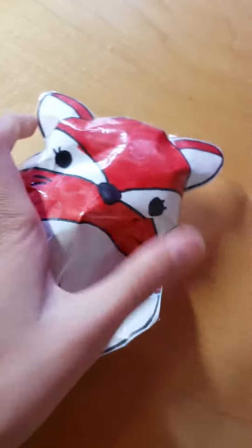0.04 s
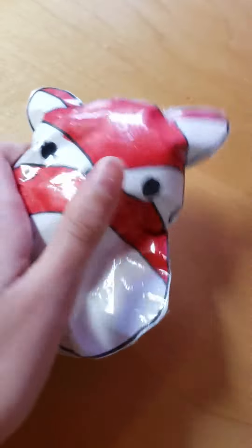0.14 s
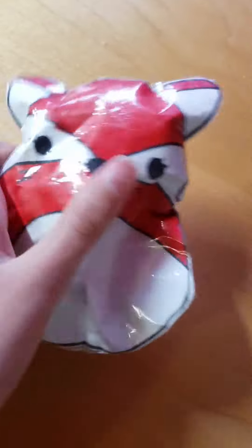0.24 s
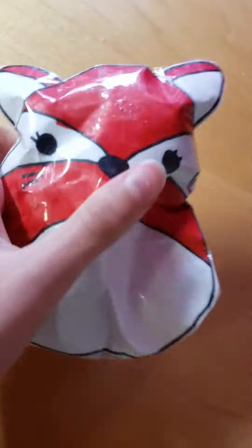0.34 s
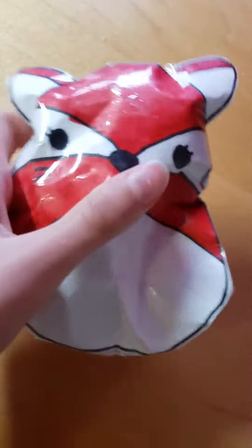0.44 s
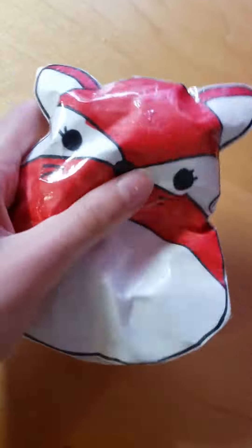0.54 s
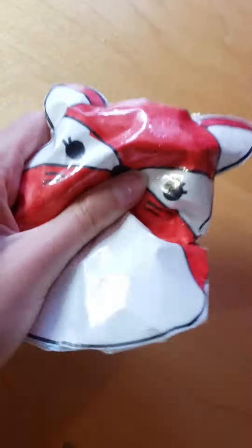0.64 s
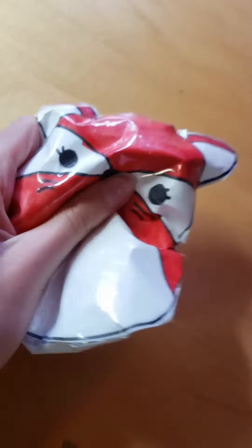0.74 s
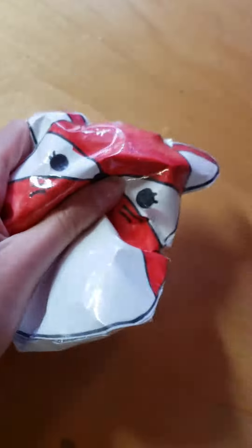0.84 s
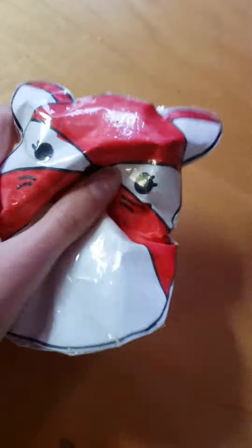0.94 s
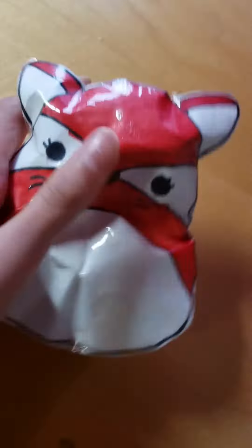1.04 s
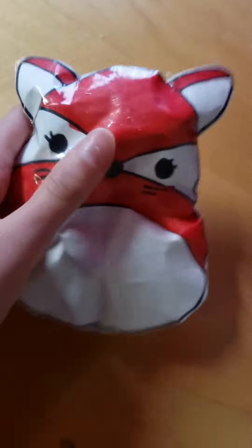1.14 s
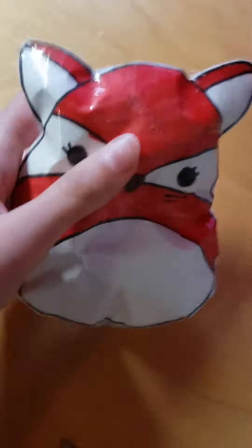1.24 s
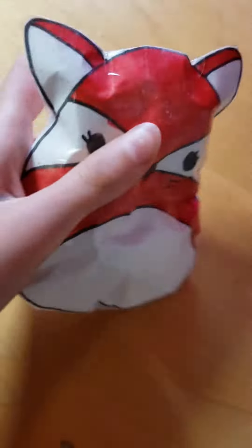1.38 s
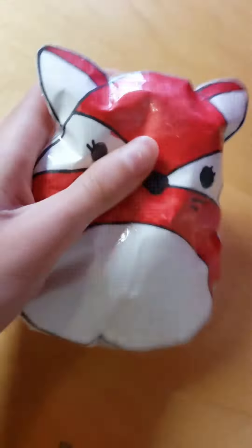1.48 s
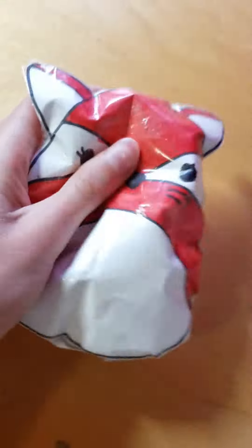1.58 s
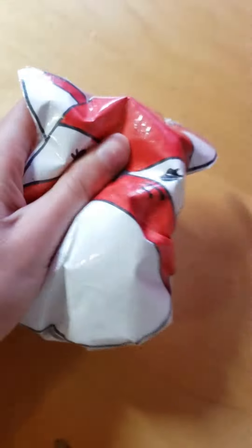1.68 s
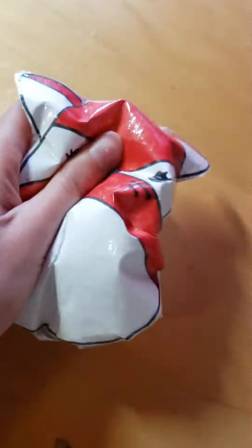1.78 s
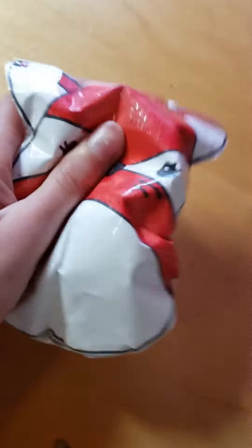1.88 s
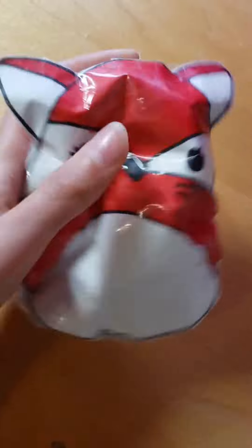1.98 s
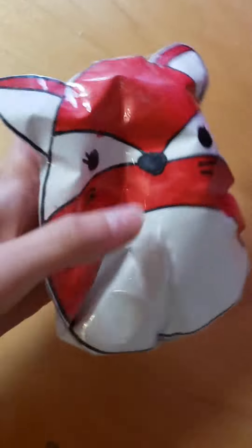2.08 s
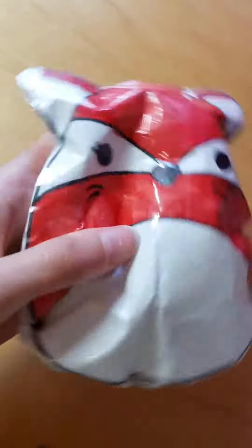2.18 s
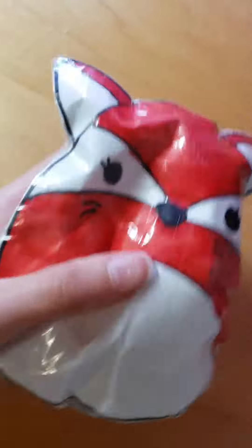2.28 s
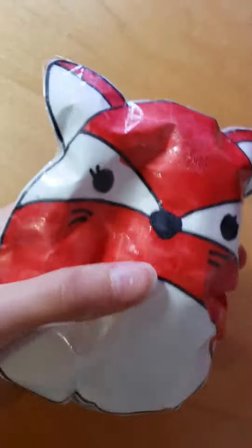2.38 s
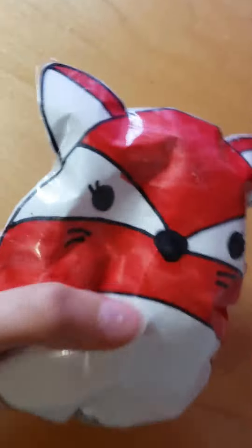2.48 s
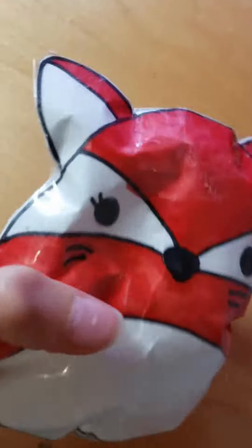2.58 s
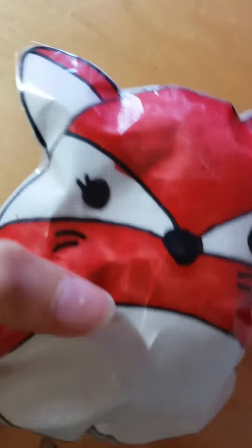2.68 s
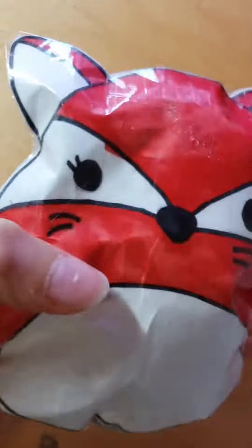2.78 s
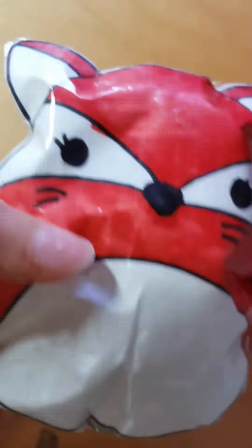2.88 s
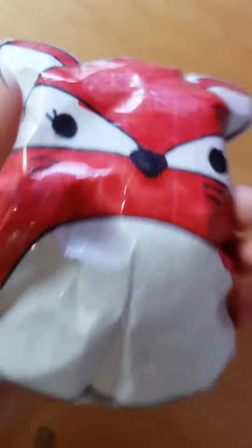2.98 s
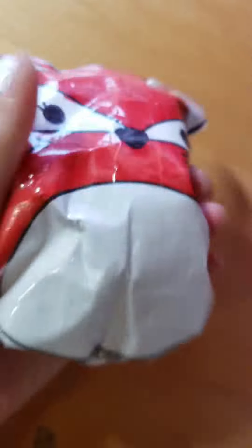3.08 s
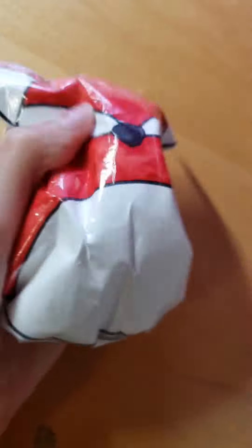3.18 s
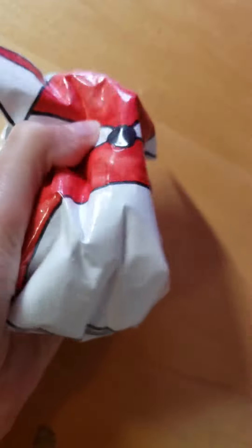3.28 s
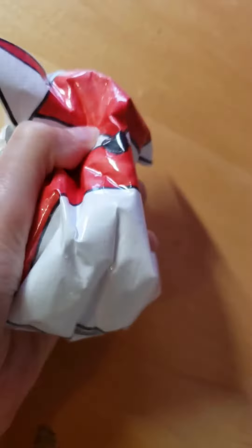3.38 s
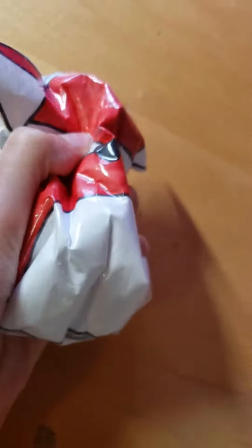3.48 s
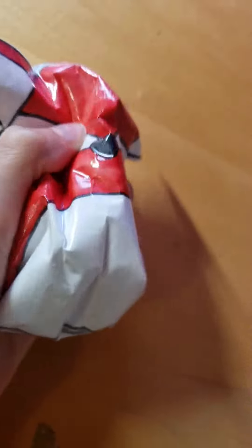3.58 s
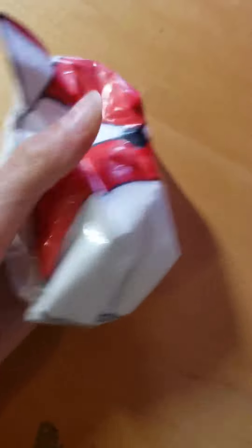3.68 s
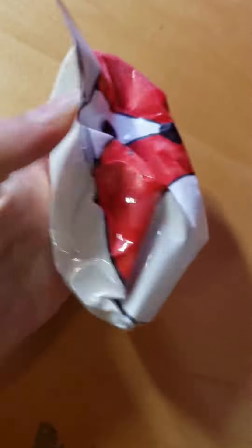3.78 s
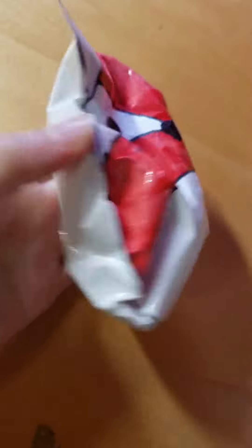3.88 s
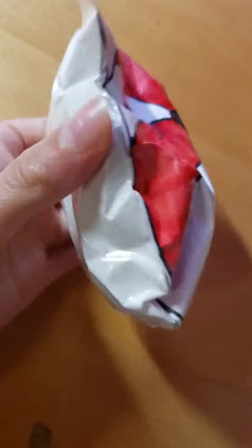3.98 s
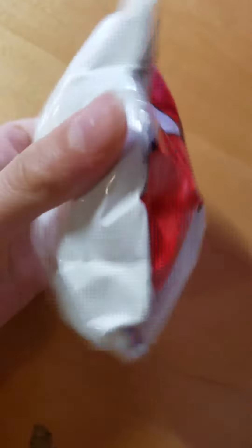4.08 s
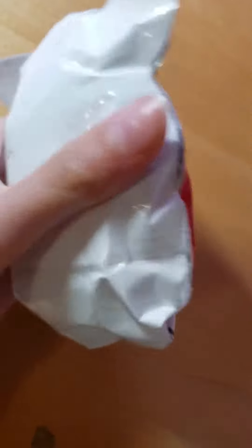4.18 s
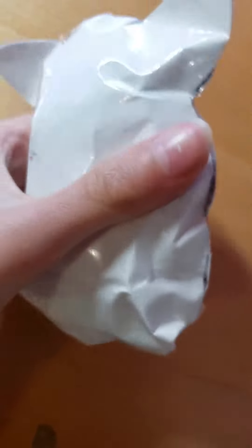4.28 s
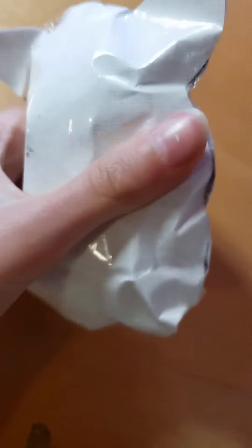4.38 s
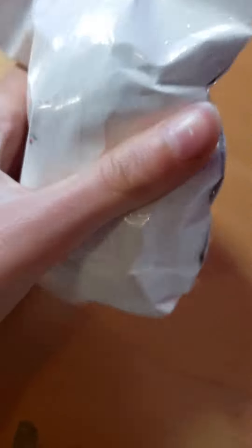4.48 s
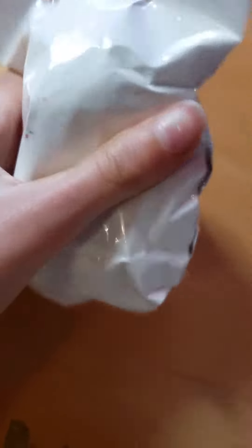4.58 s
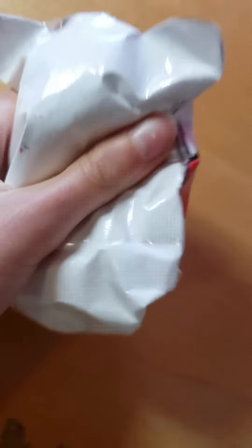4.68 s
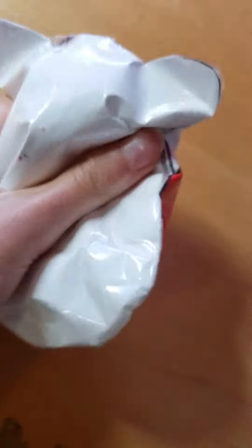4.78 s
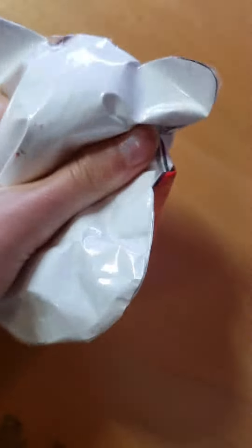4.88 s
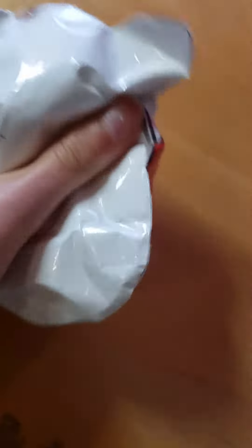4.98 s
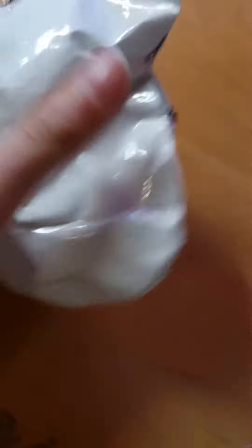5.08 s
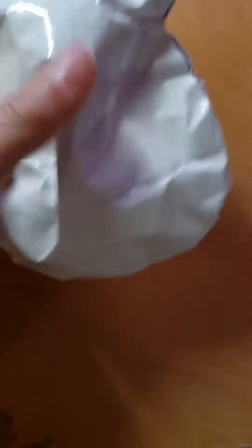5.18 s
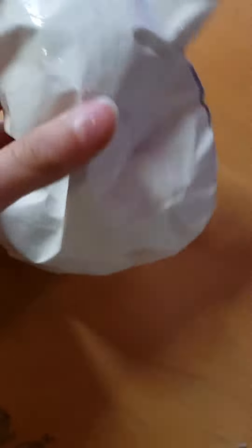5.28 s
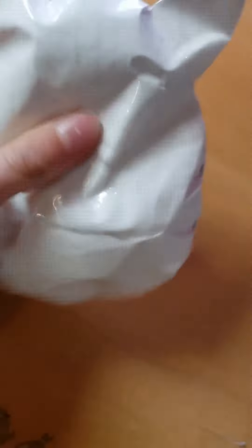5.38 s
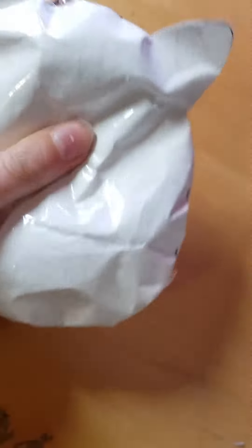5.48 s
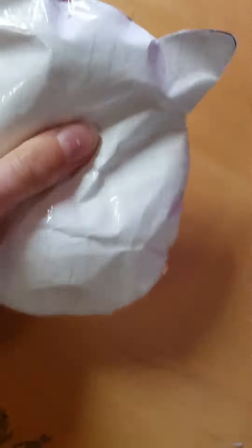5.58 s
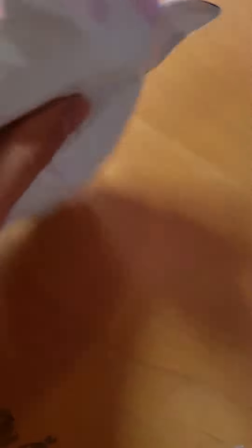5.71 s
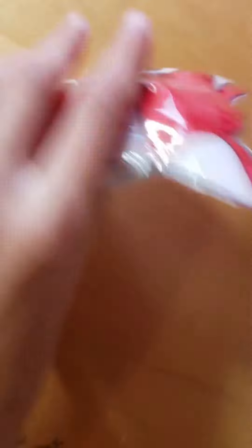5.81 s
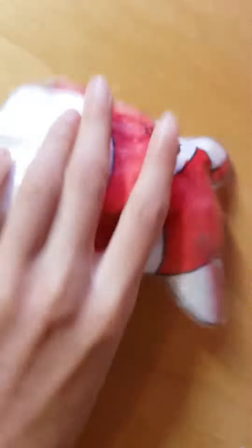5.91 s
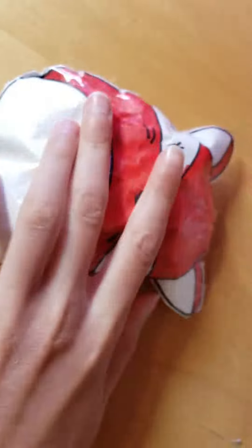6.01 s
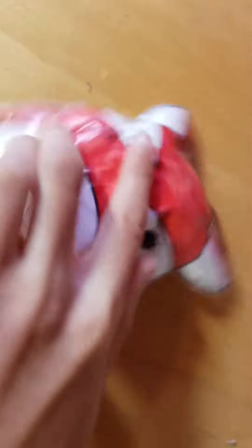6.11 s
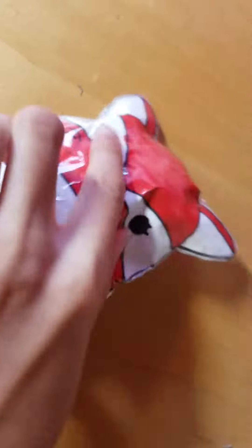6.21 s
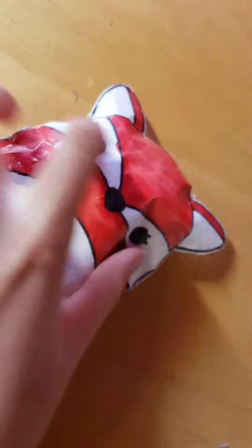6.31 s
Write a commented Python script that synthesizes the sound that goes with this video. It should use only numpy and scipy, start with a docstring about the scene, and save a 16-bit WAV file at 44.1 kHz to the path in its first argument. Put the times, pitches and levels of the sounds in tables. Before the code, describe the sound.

A puffy taped paper toy is worked in the fingers near the microphone. It starts with light crinkling, then one very loud snap, another hard low pop, a quieter passage of small creases and dull thumps, and then repeated crisp clusters of buckling as it is squeezed, turned over and handled. Air breathes out softly with the squeezes; the small room answers briefly.

```python
"""Facets of a hollow, tape-covered paper toy buckle with sharp snaps as a hand squeezes and releases it.
Each snap is a short push ringing facet and shell, with a crack of tape; smaller creases crackle and crinkle.
Shaped noise makes the low flutter of the body and the hiss of air through the seams as it empties and refills.
Soft low bumps and rubs of the hand and one faint squeak join in, close up over a table.
A small quiet room answers the toy, above a faint steady room tone."""
import sys
import numpy as np
from scipy import signal
from scipy.fft import rfft, irfft, next_fast_len
from scipy.io import wavfile

SR = 44100
rng = np.random.default_rng(int(sys.argv[2]) if len(sys.argv) > 2 else 0)


def pcm_store(signal):
    """Save signal as 16-bit PCM."""
    levels = np.round(np.clip(np.atleast_2d(signal), -1, 1) * 32767)
    wavfile.write(sys.argv[1], SR, levels.astype(np.int16).T)


N = 279946
T = np.arange(N) / SR  # seconds

# Background hum and hiss. Each row: frequency in Hz, relative level in dB.
ROOM_TONE_SPECTRUM = [(25, 12), (70, 22), (180, 15.5), (700, -54.5), (1300, 12.5), (1900, 18), (2500, 1),
                      (6000, -6), (9000, -64), (15000, -98)]
# Colour of the room's answer. Each row: frequency in Hz, relative level in dB.
WALL_SPECTRUM = [(100, 11.5), (400, -2.5), (750, -7), (1600, -4), (3000, -4), (8000, 2), (15000, 4)]
# Soft bumps of the hand. Each row: time in seconds, peak in dB, pitch in Hz.
HAND_BUMPS = [(2.455, -21, 184), (2.477, -11.5, 120), (2.537, -31.5, 102), (2.747, -35.5, 130),
              (2.989, -40.5, 117), (3.046, -19.5, 138), (6.317, -23, 114)]
# Colour of the escaping air. Each row: frequency in Hz, relative level in dB.
AIR_SPECTRUM = [(150, -26), (330, -12.5), (1300, -1), (1950, 1), (3000, -4.5), (4300, -8.5), (7400, -6),
                (8700, -11), (12300, -1.5), (15500, -1)]
# Strokes of the hand, squeezing or letting go.
# Each row: start of the hold in seconds, hold in seconds, paper level in dB, air level in dB (both before trim).
HAND_STROKES = [(0.0, 0.01, -40.5, -44), (0.145, 0.021, -51.5, -67), (0.316, 0.053, -44.5, -53),
                (0.551, 0.005, -40.5, -62.0), (0.632, 0.103, -37, -43.5), (1.018, 0.12, -50, -46.5),
                (1.311, 0.055, -46, -56), (1.576, 0.007, -29.5, -45.5), (1.61, 0.22, -51, -50),
                (2.006, 0.081, -46.5, -42), (2.271, 0.086, -44.5, -60.5), (2.474, 0.17, -56, -58),
                (2.731, 0.11, -54.5, -66), (2.997, 0.14, -47, -59), (3.214, 0.13, -33.5, -42),
                (3.739, 0.04, -39.5, -39.5), (3.848, 0.15, -50, -50), (4.056, 0.12, -44.5, -55.5),
                (4.192, 0.015, -34.5, -48), (4.511, 0.009, -36, -54.0), (4.691, 0.07, -50.5, -51),
                (4.786, 0.035, -36, -41), (5.117, 0.025, -39.5, -35.5), (5.459, 0.0035, -30.5, -44.5),
                (5.774, 0.12, -39.5, -47.5), (6.014, 0.005, -30.0, -50.5), (6.197, 0.199, -44, -49)]
# Resonances of the paper shell, the belly first, before each snap shifts them.
# Each row: centre in Hz, width in Hz, relative level in dB.
SHELL_MODES = [(382, 300, 2), (920, 130, -5.5), (1912, 170, 3.5), (3600, 2900, -3.5), (5550, 1100, 1.5)]
# Resonances of the tape skin. Each row: centre in Hz, width in Hz, relative level in dB.
TAPE_MODES = [(4300, 6500, 1), (12800, 5400, 5)]
# Large facets that buckle.
# Each row: time in seconds, level in dB over 1 ms, facet pitch in Hz, tape crack in dB over 1 ms.
FACET_SNAPS = [(0.174, -38, 1920, -68), (0.247, -24, 2040, -45), (0.3295, -18.5, 1620, -43.0),
               (0.5658, -24.5, 1140.0, -52.0), (0.6, -25.5, 1200, -53), (0.633, -21.5, 800, -50),
               (0.642, -24.5, 2190, -24.5), (0.6879, 0, 1630, -40), (0.7332, -23, 1400, -29),
               (0.746, -17.5, 1690, -53), (0.7697, -24.5, 2420.0, -53), (1.0205, -31.5, 2640, -35.5),
               (1.053, -23.5, 2000, -32), (1.081, -12.5, 1630.0, -22.0), (1.3223, -26.5, 1360, -51),
               (1.4441, -23, 1270, -43), (1.52, -22.5, 1150, -55), (1.5245, -10.5, 600, -60),
               (1.5312, -24.5, 1360.0, -45), (1.5596, -18, 1150, -51), (1.573, -3, 510, -50),
               (1.6074, -12, 1300, -45), (1.6265, -25, 1490, -35), (1.6851, -14.5, 1730, -27),
               (1.743, -29, 1690.0, -46), (1.8175, -51, 1830, -34), (1.8351, -33, 1280, -48.5),
               (1.8941, -45.5, 2730, -37.5), (2.0354, -23.5, 1300, -34.5), (2.0563, -23.5, 1280, -20.5),
               (2.2075, -32, 1820.0, -42.0), (2.2157, -29.5, 1690, -43), (2.2799, -21.5, 1280, -34.5),
               (2.322, -18.5, 1750.0, -33.5), (2.359, -39, 1830, -59), (2.4683, -28.5, 570.0, -56),
               (2.4978, -24.5, 1200, -61.5), (2.5462, -29.0, 823, -49), (2.7265, -29.5, 2800, -41.5),
               (2.8307, -34, 2030, -53.5), (2.9672, -29, 2600.0, -38), (3.0192, -29, 2010, -41.5),
               (3.0629, -22, 1120, -62), (3.1995, -18, 975, -42), (3.2047, -20.5, 2000, -33),
               (3.2111, -9.5, 1310, -43), (3.2247, -29, 2700, -24.5), (3.2333, -8.5, 600, -35.0),
               (3.2959, -10.0, 1620, -36), (3.3842, -32.5, 1300, -42.5), (3.4246, -27.5, 2240, -44),
               (3.7202, -7, 2000, -21.5), (3.7649, -18.5, 1440, -33.0), (3.9844, -34.0, 1730, -30),
               (4.1892, -20, 1730, -33), (4.2053, -12, 1330, -33), (4.2157, -24.5, 1590, -40),
               (4.4877, -24.0, 1980, -29.5), (4.5271, -16, 1930, -49), (4.5356, -5.5, 1380, -29),
               (4.6588, -41.5, 2600, -39.5), (4.6835, -30, 2280, -37), (4.7273, -22, 1760, -25),
               (4.7544, -31.5, 2620, -31.0), (4.7987, -8.5, 1420, -21), (4.81, -7.5, 1010, -39),
               (4.8553, -24.0, 1000, -43), (5.1062, -20.0, 1230, -29.5), (5.1575, -14.0, 1430, -26),
               (5.1605, -21, 2590, -20), (5.4049, -15.5, 685, -61.5), (5.4387, -14, 1190, -34.5),
               (5.4604, -17, 1430, -42.5), (5.4712, -6.5, 1320, -30), (5.4751, -7.0, 2200, -26.5),
               (5.4926, -22.5, 1030, -41), (5.7698, -17.5, 1140, -48), (5.8804, -20, 1300, -28.5),
               (5.8965, -23, 1410.0, -23.5), (5.909, -25, 880.0, -43), (5.9353, -12.5, 1460, -30.5),
               (5.9947, -21.5, 1300, -44.0), (6.02, -10.5, 1420, -34), (6.0414, -8, 1210, -29),
               (6.0614, -24, 1400, -48), (6.2332, -24.5, 1580, -39.5), (6.315, -7, 1210, -34.0)]

TOP_HZ = 15750
PAPER_RISE_DB_PER_S, PAPER_FALL_DB_PER_S = 328, 228.5  # the paper stirs and settles with the fingers
AIR_RISE_DB_PER_S, AIR_FALL_DB_PER_S = 282.5, 124.5  # the air leaks on for longer
MIDDLE_FACET_HZ, BELLY_DB, BELLY_DB_PER_OCTAVE = 1370, 0.5, 9  # larger, lower facets shake the belly more
RUB_BELOW_BUMP_DB, RUB_LEAD_S, RUB_FADE_DB_PER_S = -28, 0.132, 120  # the skin slides before each bump
RUB_MOST_DB = -54.5  # ceiling for each single rub
SQUEAK_S, SQUEAK_HALF_S, SQUEAK_HZ, SQUEAK_DB = 0.075, 0.036, 800, -51


def undb(db):
    """Decibels to gain."""
    return 10 ** (np.asarray(db) / 20)


def unit(x):
    """Scale to rms 1."""
    return x / np.sqrt(np.mean(x ** 2))


def noise(size=N):
    """White noise, raw material for every breathy or ragged sound."""
    return rng.standard_normal(size)


def colour(x, points):
    """Filter by a spectrum of (Hz, dB) points, joined along log frequency."""
    hz, db = np.transpose(points)
    size = next_fast_len(len(x))
    f = np.maximum(np.fft.rfftfreq(size, 1 / SR), 1)
    gain = undb(np.interp(np.log(f), np.log(hz), db))
    return irfft(rfft(x, size) * gain, size)[:len(x)]


def walk(rate):
    """Random wander through `rate` new values a second, spread near 1."""
    knots = rng.standard_normal(2048)
    return np.interp(T * rate, np.arange(len(knots)), knots)


def add(out, sound, s):
    """Mix a short sound in, its middle at time s."""
    start = int(s * SR) - len(sound) // 2
    lo, hi = max(start, 0), min(start + len(sound), N)
    if hi > lo:
        out[lo:hi] += sound[lo - start:hi - start]


def swell(gestures, rise_db_per_s, fall_db_per_s):
    """Amplitude of gestures that build, hold and ease off, from rows (hold start s, hold s, dB)."""
    t = T[::50]  # a coarse clock is enough for hand movement
    power = np.zeros(len(t))
    for s, hold_s, db in gestures:
        before = np.maximum(s - t, 0)
        after = np.maximum(t - s - hold_s, 0)
        power += undb(db - rise_db_per_s * before - fall_db_per_s * after) ** 2
    return np.interp(T, t, np.sqrt(power))


def resonance(f, hz, width):
    """Response of one damped mode, gain 1 at its centre."""
    return 1j * f * width / (hz ** 2 - f ** 2 + 1j * f * width)


def room_tone(level_db=-59):
    """Faint background noise with a hump near 2 kHz, drifting slightly in level."""
    return unit(colour(noise(), ROOM_TONE_SPECTRUM)) * undb(level_db + 0.803 * walk(0.57))


def room(x, wet_db=-14, t60=0.34, near_db=-14, near_s=0.0073, size=24000):
    """Quick scatter off the hand and the table, then the tail of a small room."""
    t = np.arange(size) / SR
    near = noise(size) * np.exp(-t / near_s) * (t > .0015)
    near = colour(near, [(200, 14.5), (800, -2.5), (1200, 4.5), (2000, -5.5), (2800, 6), (15000, 7)])
    tail = colour(noise(size) * undb(-60 * t / t60) * (t > .007), WALL_SPECTRUM)
    # each part is scaled by the energy of its decay
    near_norm = np.sqrt(near_s * SR / 2)
    tail_norm = np.sqrt(t60 * SR / 2 / np.log(1000))
    response = undb(near_db) * near / near_norm + undb(wet_db) * tail / tail_norm
    return x + signal.fftconvolve(x, response)[:N]


def rub(slide):
    """Skin shifting its grip rumbles faintly: low noise that follows the slide."""
    rumble = colour(noise(), [(40, -9), (90, -3.5), (180, -6.5), (300, -5), (900, -73)])
    return unit(rumble) * slide


def bumps(cycles=0.66):
    """A soft contact pushes the body through a cycle or two of its lowest motion."""
    out, t = np.zeros(N), np.arange(-2048, 2048) / SR
    for s, db, hz in HAND_BUMPS:
        envelope = np.exp(-(t * hz / cycles) ** 2)
        add(out, undb(db) * np.cos(2 * np.pi * hz * t) * envelope, s)
    return out


def squeak(waver=0.0068):
    """A fingertip sticks and slips on the glossy tape: one faint, brief, wavering tone."""
    phase = 2 * np.pi * np.cumsum(SQUEAK_HZ * (1 + waver * walk(60))) / SR
    envelope = np.exp(-((T - SQUEAK_S) / SQUEAK_HALF_S) ** 2)
    return undb(SQUEAK_DB) * np.sin(phase) * envelope


def air(flow, trim_db=1):
    """Air forced through gaps in the taped seams hisses and flickers with the flow."""
    return unit(colour(noise(), AIR_SPECTRUM)) * flow * undb(trim_db + 2 * walk(33))


def flex(press, level_db=-50, growth=1.94):
    """The whole hollow body flutters low when it is pressed hard."""
    low = colour(noise(), [(25, -15.0), (85, 0.5), (220, -5.5), (360, -6.0), (700, -18), (1500, -41.5)])
    return unit(low * press ** growth * undb(3.0 * walk(40))) * undb(level_db)


def belly(facet_hz):
    """How strongly a facet of this pitch drives the belly mode, dB."""
    return BELLY_DB - BELLY_DB_PER_OCTAVE * np.log2(facet_hz / MIDDLE_FACET_HZ)


def buckle(db, facet_hz, belly_db, crack_db, rough, quickness=2.03, facet_db=4.5, damping=0.79,
           dipole_hz=320, detune=0.029, scatter_db=2, crack_s=0.002, build_s=0.00074, size=768):
    """One facet flips: a bell-shaped push rings the facet and the shell, and the tape on it cracks."""
    f, t = np.fft.rfftfreq(size, 1 / SR), (np.arange(size) - size // 2) / SR
    hz, width, mode_db = np.transpose(SHELL_MODES)

    # every dent reshapes the shell, so its modes shift from snap to snap
    shift, strength = rng.standard_normal((2, len(hz)))
    is_belly = np.arange(len(hz)) == 0
    gain = undb(mode_db + scatter_db * strength + belly_db * is_belly)
    shell = resonance(f[:, None], hz * np.exp(detune * shift), width) @ gain
    facet = undb(facet_db) * resonance(f, facet_hz, damping * facet_hz)

    # an avalanche of tiny slips builds up to the flip and dies away after it
    slips = noise(size) * np.exp(-np.abs(t) / np.where(t < 0, build_s, crack_s))
    force = (t == 0) + rough * slips / np.linalg.norm(slips)
    push = 1 / (1 + (f / (quickness * facet_hz)) ** 2) ** 2  # large facets flip slowly and sound dull
    radiation = f ** 2 / np.hypot(f ** 2, dipole_hz ** 2)  # a small sheet radiates little bass
    body = irfft(rfft(force) * push * (shell + facet) * radiation)

    tape = sum(undb(g) * resonance(f, centre, w) for centre, w, g in TAPE_MODES) * (f < TOP_HZ)
    crack = irfft(rfft(slips * np.exp(-np.abs(t) / crack_s)) * tape)  # the stiff tape settles sooner

    millisecond = np.sqrt(SR / 1000 / size)  # turns rms over the whole snap into level over 1 ms
    return millisecond * (undb(db) * unit(body) + undb(crack_db) * unit(crack))


def crinkle(press, facet_hz=1400, spread_db=6.5, belly_db=0, crack_db=-29, trim_db=-2, count=2100):
    """A dense scatter of tiny creases of all sizes, each giving way in a ragged run of slips."""
    out = np.zeros(N)
    times = rng.uniform(0, N / SR, count)
    chance = np.clip(rng.standard_normal((count, 3)), -2, 2)
    for s, (strength, smallness, belly_chance) in zip(times, chance):
        db = spread_db * strength
        hz = facet_hz * np.exp(0.5 * smallness)
        crease = buckle(db, hz, belly_db + 4 * belly_chance, db + crack_db, rough=1.6,
                        quickness=2.2, facet_db=7.5, damping=0.18)
        add(out, crease, s)
    return unit(out) * press * undb(trim_db)


def crackle(press, above_press_db=4, spread_db=4, facet_hz=1750, light_press_db=-48, octaves_per_db=0.19,
            spread_octaves=0.34, crack_db=-24, rough=0.8, count=190):
    """Middling facets give way at random; a harder press folds larger ones, louder and lower."""
    out = np.zeros(N)
    times = rng.uniform(0, N / SR, count)
    pressed = 20 * np.log10(np.interp(times, T, press) + 1e-9)
    chance = np.clip(rng.standard_normal((count, 3)), -1.7, 1.7)
    for s, press_db, (strength, smallness, taped) in zip(times, pressed, chance):
        db = press_db + above_press_db + spread_db * strength
        lowering = octaves_per_db * max(press_db - light_press_db, 0)
        hz = facet_hz * 2 ** (spread_octaves * smallness - lowering)
        add(out, buckle(db, hz, belly(hz), db + crack_db + spread_db * taped, rough), s)
    return out


def snaps(rough=0.3, tidying=0.33):
    """The large facets, one at a time; the harder the snap, the more it is a single clean flip."""
    out = np.zeros(N)
    for s, db, facet_hz, crack_db in FACET_SNAPS:
        roughness = rough * undb(-tidying * db)
        add(out, buckle(db, facet_hz, belly(facet_hz), crack_db, roughness), s)
    return out


def scene():
    """Strokes work the paper and move air, and the room answers; bumps and rubs are only heard close by."""
    paper_strokes = [(s, hold_s, db) for s, hold_s, db, _ in HAND_STROKES]
    air_strokes = [(s, hold_s, db) for s, hold_s, _, db in HAND_STROKES]
    rubs = [(s - RUB_LEAD_S, RUB_LEAD_S, min(db + RUB_BELOW_BUMP_DB, RUB_MOST_DB)) for s, db, _ in HAND_BUMPS]
    press = swell(paper_strokes, PAPER_RISE_DB_PER_S, PAPER_FALL_DB_PER_S)
    flow = swell(air_strokes, AIR_RISE_DB_PER_S, AIR_FALL_DB_PER_S)
    slide = swell(rubs, RUB_FADE_DB_PER_S, RUB_FADE_DB_PER_S)
    toy = snaps() + crackle(press) + crinkle(press) + flex(press) + air(flow) + squeak()
    return (room(toy) + bumps() + rub(slide) + room_tone())[None]


def record(dry):
    """Peaks past full scale are clipped, then a steep low-pass cuts the top."""
    low_pass = signal.ellip(10, .2, 70, TOP_HZ, fs=SR, output="sos")
    return signal.sosfilt(low_pass, np.clip(dry, -1, 1))


dry = scene()
out = record(dry)
pcm_store(out)
```